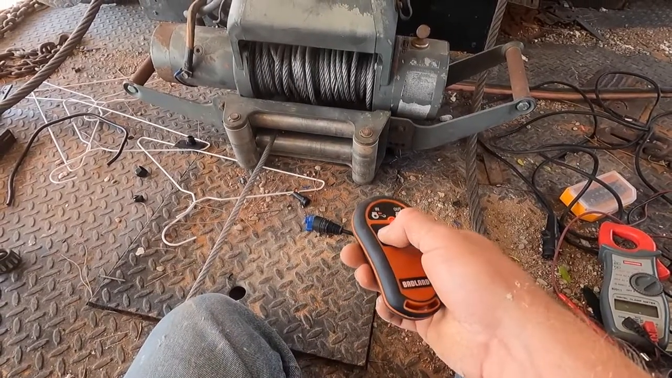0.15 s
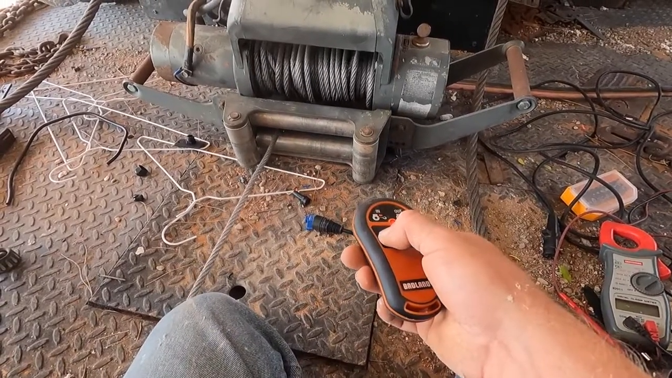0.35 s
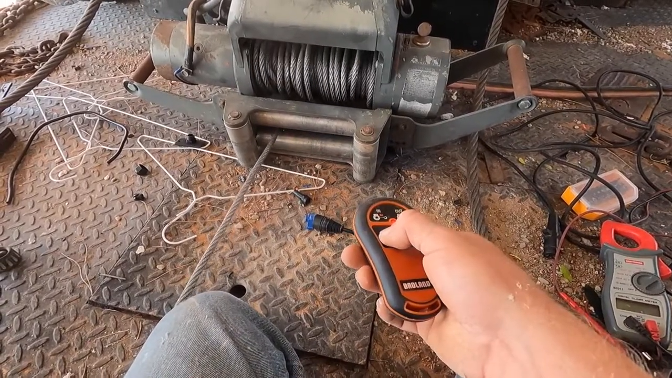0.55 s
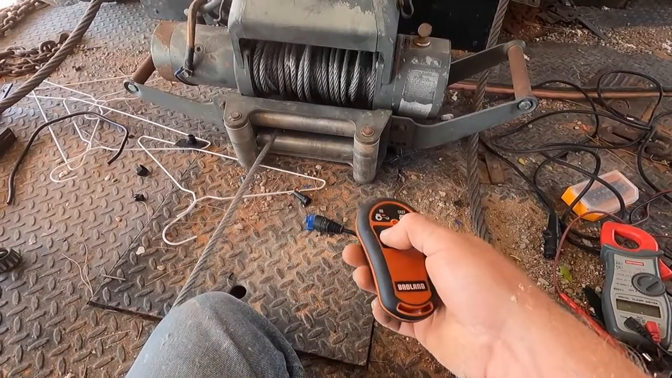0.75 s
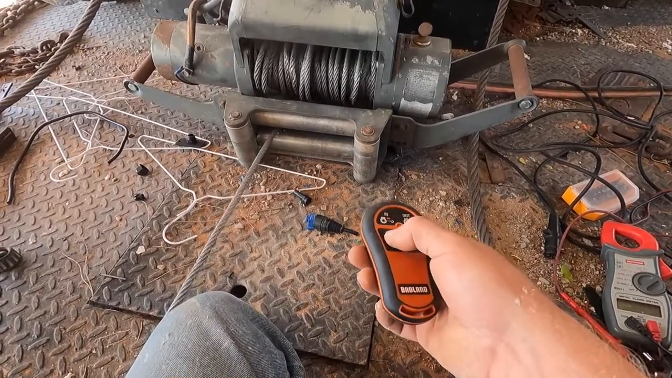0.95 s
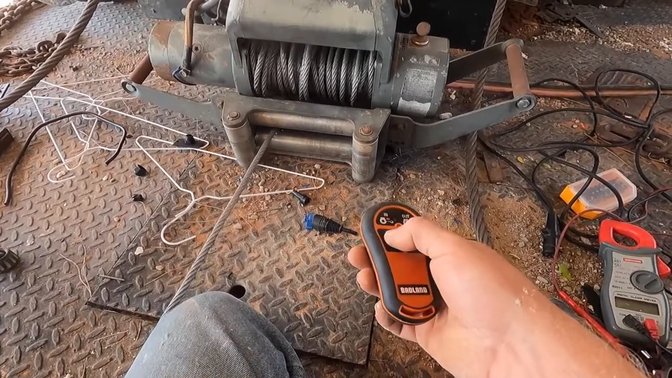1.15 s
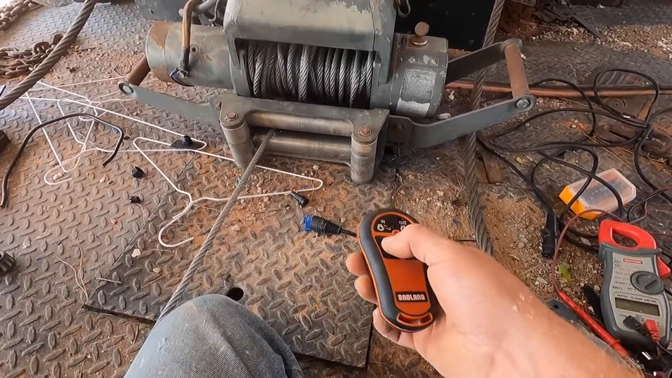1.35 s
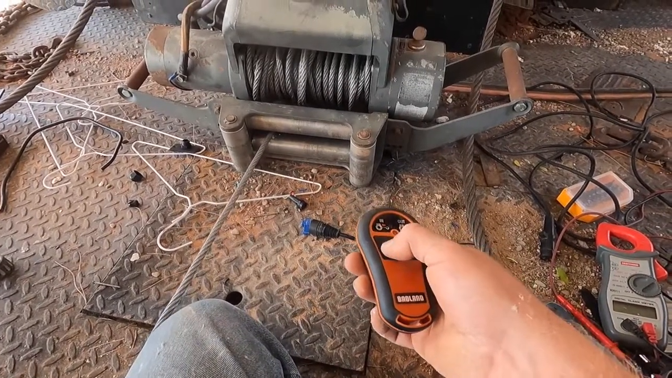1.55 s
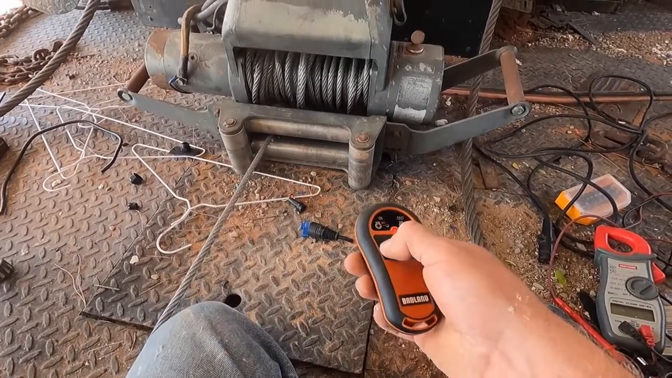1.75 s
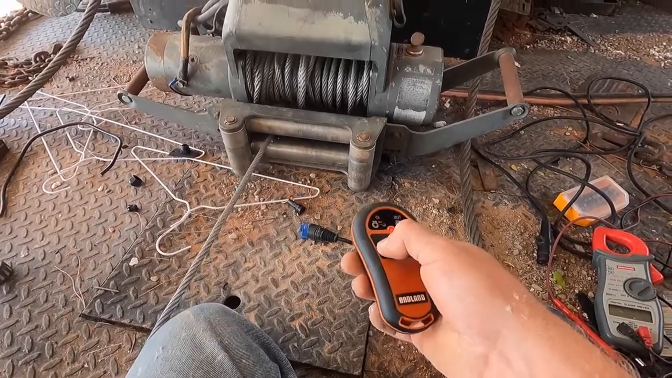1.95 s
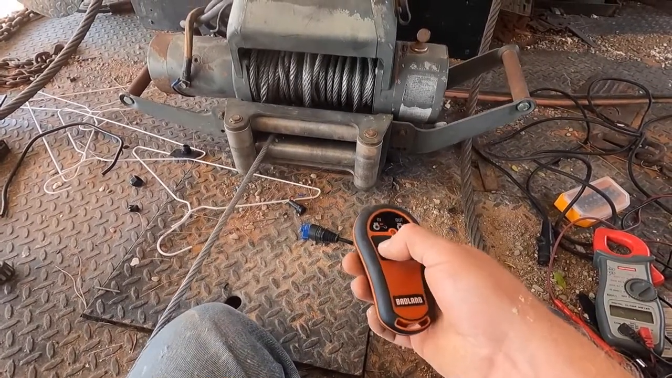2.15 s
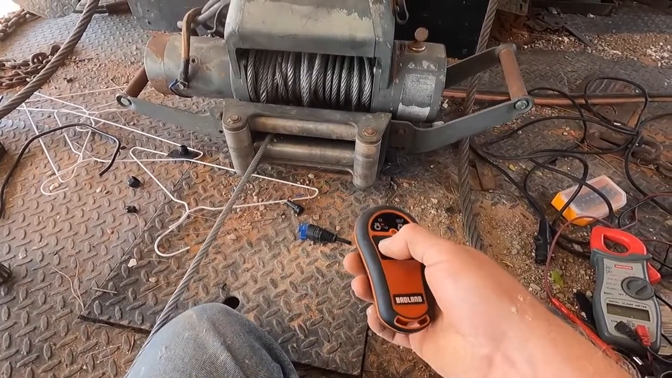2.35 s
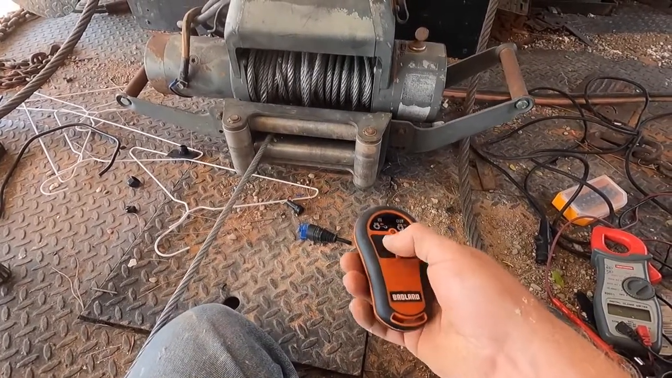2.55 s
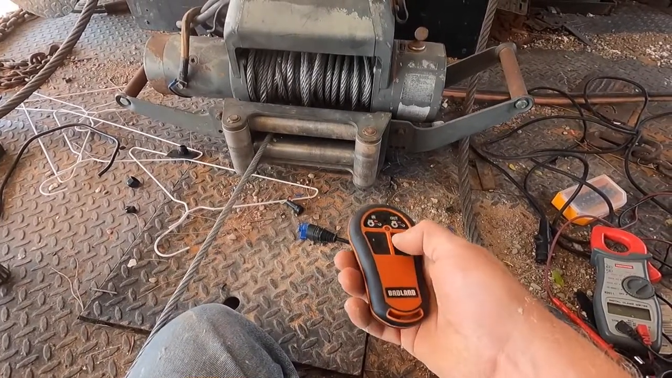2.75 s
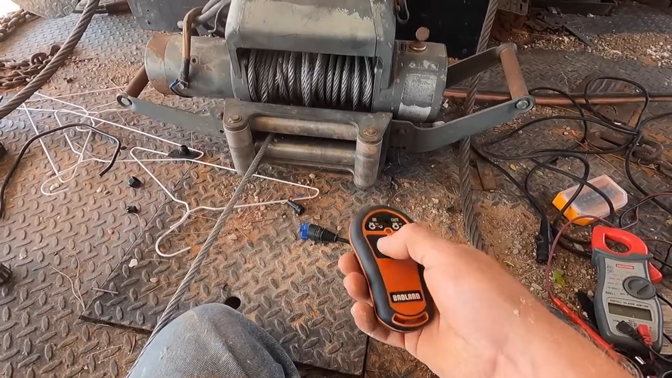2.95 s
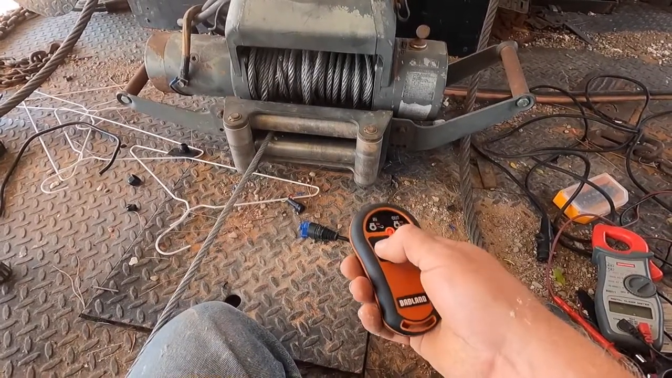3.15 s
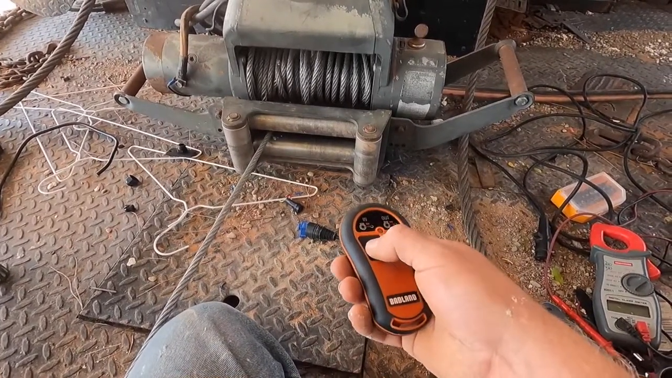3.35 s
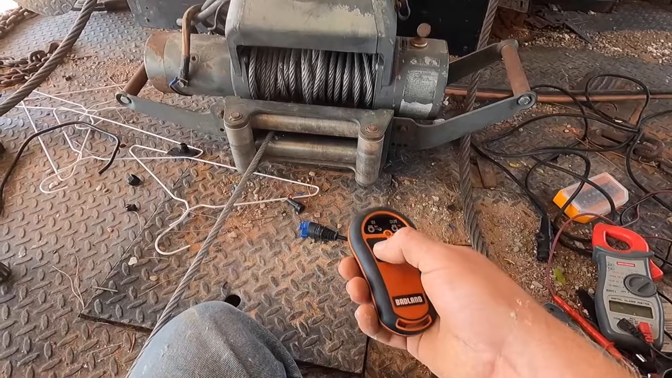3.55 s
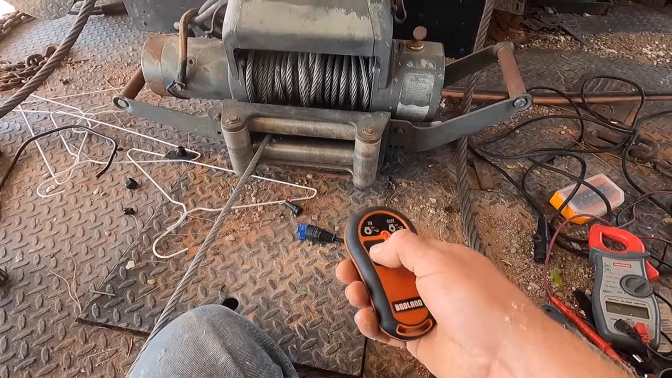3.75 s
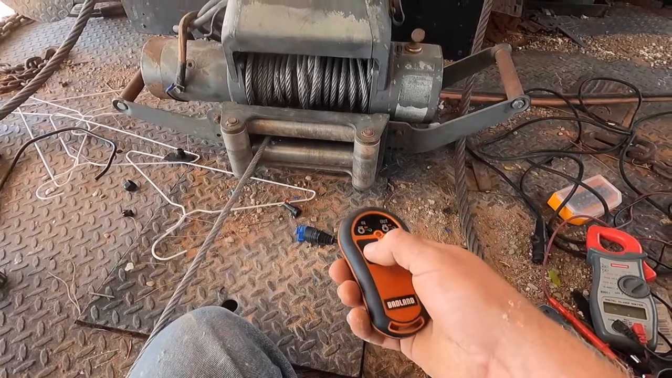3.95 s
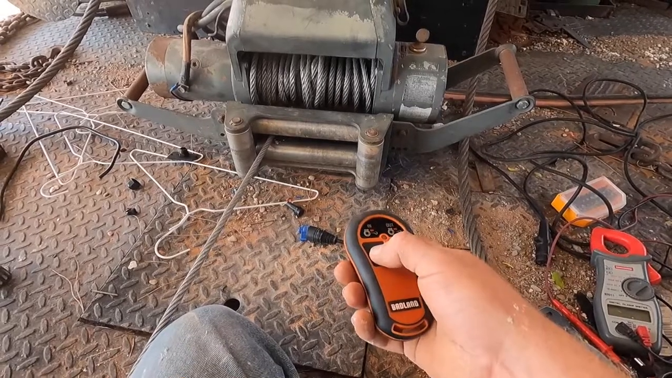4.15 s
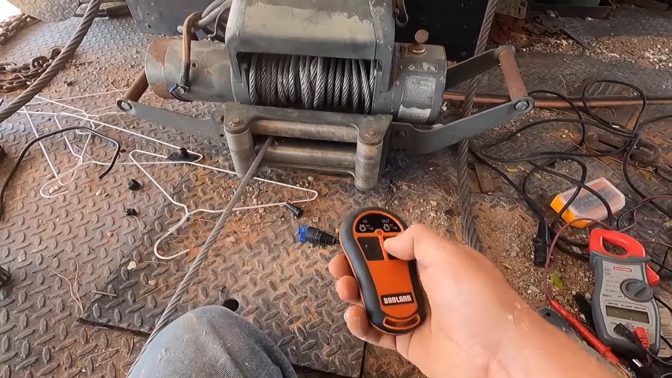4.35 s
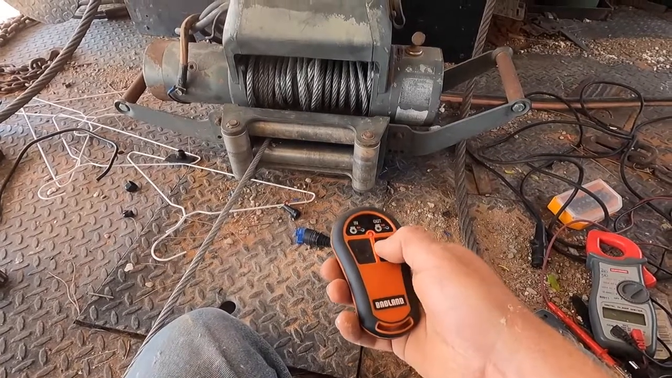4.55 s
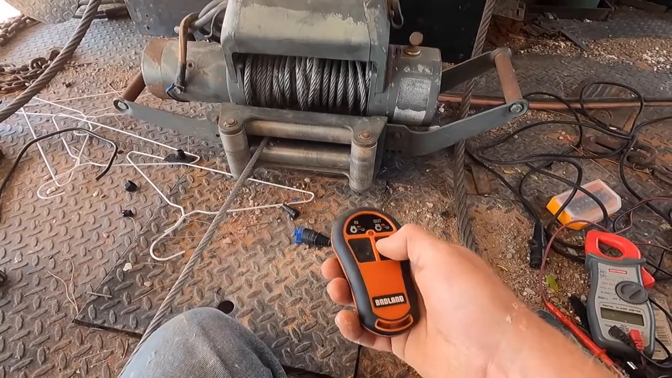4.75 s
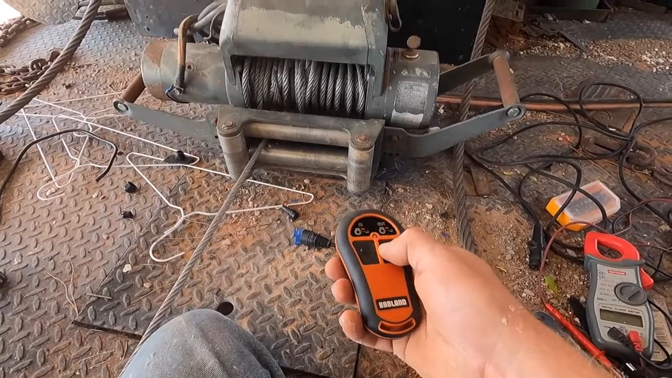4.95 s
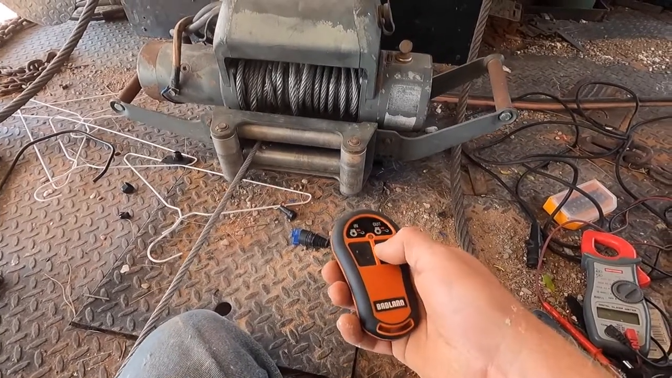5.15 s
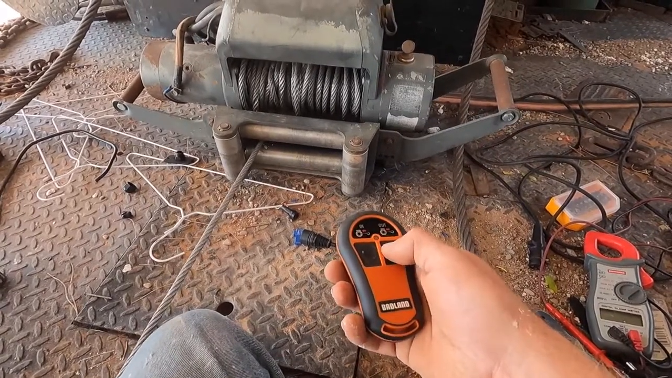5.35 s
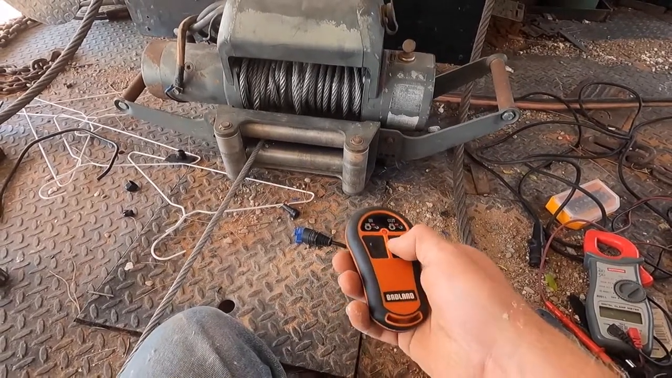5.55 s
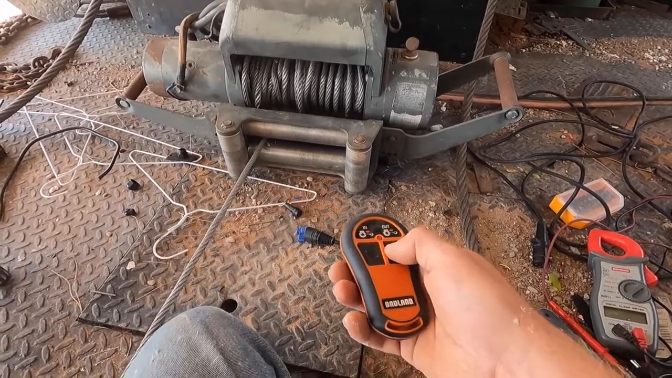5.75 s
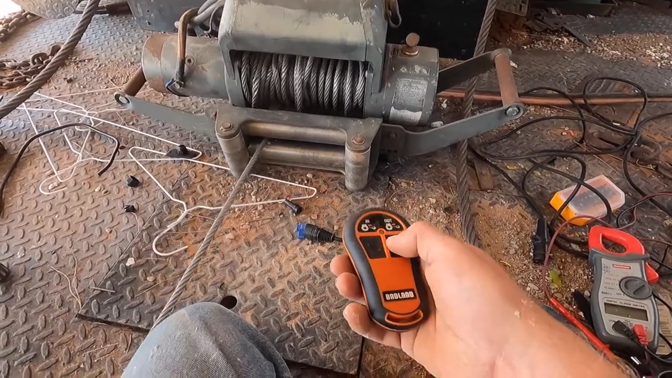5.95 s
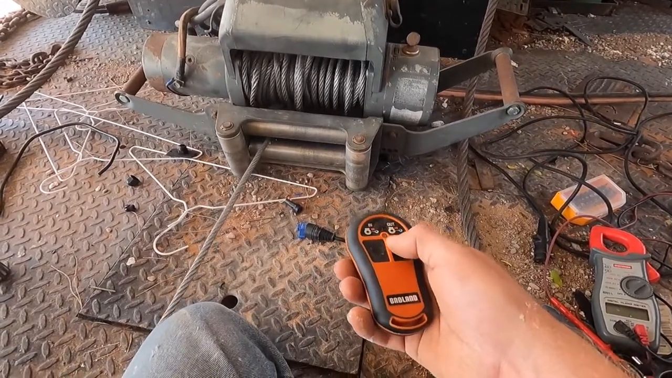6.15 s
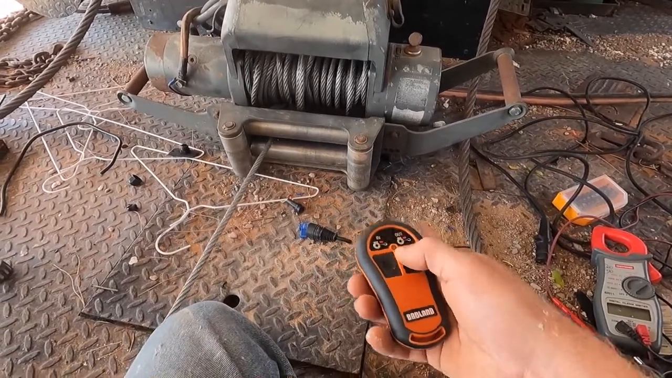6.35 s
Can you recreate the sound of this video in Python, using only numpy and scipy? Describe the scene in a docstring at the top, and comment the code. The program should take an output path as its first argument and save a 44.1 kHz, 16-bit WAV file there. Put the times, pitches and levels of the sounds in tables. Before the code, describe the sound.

Short bursts of a rattling electric winch motor start with a clack and wind down, amid rope cracks, deck thumps, gritty brake rasps and a faint passing engine.

```python
"""An engine drones past far off, as filtered noise and a pulsing tone, while an earlier winch run dies away.
The wire rope ticks and thumps the steel truck deck: short cracks and fading tones. Six times the contactor clacks,
the motor whines up as a gliding tone, gears rattle as tiny impacts, and a knock and a coast down follow.
From the second run on, a button clicks before four of the runs and the rope judders now and then.
The drum brake rasps in runs two to four, as gritty noise with chatter; near the fifth, steel squeaks once.
"""
import sys
import numpy as np
from scipy import signal
from scipy.fft import rfft, irfft, next_fast_len
from scipy.io import wavfile
from scipy.ndimage import uniform_filter1d, map_coordinates

SR = 44100
rng = np.random.default_rng(int(sys.argv[2]) if len(sys.argv) > 2 else 0)


def generate_wav(sig):
    """Save sig (samples, or channels by samples) to the path in sys.argv[1] as 16-bit PCM at SR."""
    pcm = np.round(np.clip(np.atleast_2d(sig).T, -1, 1) * 32767).astype(np.int16)
    wavfile.write(sys.argv[1], SR, pcm)


N = 286650

# In spectra and sets of modes, levels are relative: the sound is scaled afterwards.
# passing vehicle, one row per sound: loudest at t/s, half-width/s, level/dB
FIRING_PASS = (2.1, .42, -27.8)
EXHAUST_PASS = (1.6, .55, -28)
TYRE_PASS = (1.55, .52, -32.5)
# engine firing tone and its multiples: multiple, level/dB
FIRING_ORDERS = [(1, 0), (2, -10.5), (3, -6.5)]
# outdoor spectra (exhaust, tyres, open air, air buffeting the microphone): f/Hz, level/dB
EXHAUST = [(20, -10), (45, -14.5), (70, 2.5), (130, -1.5), (200, -8), (350, -8), (600, -25), (1000, -13.5),
           (2000, -38.5), (5000, -43), (12000, -68)]
TYRES = [(200, -14), (450, -1), (700, 1), (1000, 0), (1600, -7), (2500, -24), (4000, -29), (6500, -39),
         (9000, -60), (15000, -80)]
AIR = [(20, 7), (45, -2), (75, 9), (120, 4), (250, -5), (500, -7), (1000, 2.5), (1600, 2), (3000, -9),
       (6000, -19), (10000, -36), (15800, -62)]
BUFFET_SPECTRUM = [(12, 1), (25, 2.5), (38, 10), (55, -5), (120, -46), (500, -92)]
# air buffeting the microphone: t/s, level/dB
BUFFET_LEVEL = [(0.0, -49), (0.36, -56), (1.88, -46), (1.94, -39), (3.06, -50), (3.13, -31), (3.6, -50),
                (3.75, -45), (4.89, -55), (5.16, -47), (5.6, -56), (6.5, -58)]
# motor runs, the first already dying away: switched on t/s, powered/s, coast/s, run-up time constant/s,
# whine level/dB (before its resonance), deck rumble level/dB (before its lift), gear rattle level/dB,
# brush hiss level/dB (before its lift), build-up time constants of rattle/s and hiss/s
JOGS = [(-.7, .3, .7, .05, -30, -35, -33, -48, .05, .07),
        (.105, 0.75, 0.85, 0.205, -28, -29.5, -25.5, -40.8, .3, .12),
        (1.893, 0.34, .42, 0.048, -26, -28.5, -27.5, -42.5, .045, .045),
        (3.272, 0.21, .28, 0.055, -24, -27.5, -30, -41, .055, .04),
        (3.903, 0.21, 0.23, .054, -22.5, -30.5, -31.5, -46.5, .035, .03),
        (4.65, 0.18, .5, .062, -21, -34, -30.5, -43.5, .07, .05),
        (5.742, .16, 0.62, .047, -19, -30, -29, -41.3, .06, .05)]
# spectra of the deck, gears and brushes: f/Hz, level/dB
DECK = [(60, -35.5), (90, -2.5), (150, -9.5), (210, 0.5), (245, 4), (290, -2.5), (335, -7.5), (400, -8),
        (560, -14), (800, -30.5), (1500, -73)]
GEARS = [(250, -31), (480, -6.5), (720, -1.5), (1000, -1.3), (1700, -2.5), (2300, -13.5), (3500, -18),
         (6000, -52), (12000, -96)]
BRUSHES = [(1000, -14.5), (2200, 6), (3200, 0.5), (4700, 0.5), (6000, -4), (7500, -6), (8800, -13.5),
           (11000, -16), (13500, -25.5), (15000, -32), (15800, -48)]
# resonances of the gear casing: f/Hz, width/Hz, lift/dB
CASING = [(723.5, 30, 7.5), (828, 34, 8), (925, 100, 7.5), (1260, 130, 5), (1466, 52, 5.5), (1590, 15, 3),
          (1830, 180, 5.5), (2243, 30, 6.5), (2905, 115, 6.5), (3570, 270, 2.5), (4115, 110, 9.5),
          (4600, 110, 3), (4790, 90, 4), (5320, 160, 2), (6336, 220, 8), (6830, 260, 4), (7750, 160, 6.5)]
# motor (commutator) tone and its neighbours: multiple of the shaft speed, level/dB
WHINE_ORDERS = [(16, -10), (22, -12), (28, -11), (32, -1), (36, -14)]
# likeness of left and right: f/Hz, likeness from 0 to 1
ALIKE = [(60, 0.98), (200, 0.98), (500, 0.82), (1000, 0.84), (2000, 0.35), (4000, 0.66), (8000, 0.7),
         (12000, 0.1)]
# how long the yard's echo takes to fall 60 dB: f/Hz, fall time/s
YARD = [(200, 0.092), (2000, 0.28), (10000, 0.1)]
# rubbing parts lock onto one resonance for a moment: middle t/s, length/s, f/Hz, width/Hz, level/dB
SINGING = [(0.648, 1.2, 246, 35, -30), (0.748, 1.2, 722, 70, -30), (.65, .8, 6350, 130, -44),
           (2.349, 0.071, 2900, 60, -31), (3.39, .14, 900, 50, -29), (3.384, 0.055, 3610, 60, -31),
           (3.388, 0.074, 2700, 60, -31), (3.43, .07, 8270, 120, -42), (4.037, .06, 3860, 60, -30),
           (4.052, .09, 2600, 60, -30), (4.05, .1, 3240, 60, -30), (4.85, .24, 2220, 140, -35),
           (5.85, .12, 1320, 110, -31), (6.19, .16, 1290, 130, -31), (6.02, .4, 2030, 220, -35),
           (6.08, .4, 965, 80, -34), (6.39, .12, 240, 35, -33)]
# rope strands snap over each other: t/s, level/dB (before a 3.5 dB cut for the snap), ring f/Hz, crack level/dB
TICKS = [(.0682, -33, 4700, 2), (.129, -22, 6400, -6), (.1427, -13.5, 1870, 0), (1.455, -31, 2600, 4),
         (1.509, -26, 2797, 0), (2.162, -13, 1870, 0), (2.1805, -12, 5260, 0), (2.253, -12, 5050, 0),
         (2.4114, -21, 2000, 1), (2.4723, -6.5, 5300, 0), (3.3324, -19, 1940, 0), (3.427, -11, 2320, 0),
         (3.44, -11, 3720, 0), (3.5194, -19, 4300, 0), (3.6221, -9.5, 3390, 0), (3.9975, -15, 2560, 1),
         (4.2044, -16, 3400, -4), (4.4308, -14, 1760, 0), (4.451, -23, 2150, 1), (4.9701, -23, 1830, -4),
         (5.0598, -21, 2010, 1), (5.0791, -20, 1944, 1), (5.0993, -23.5, 2000, 0), (5.1497, -21, 1862, 1),
         (5.2008, -18, 2250, -7), (5.3153, -36, 2700, -6), (6.0046, -8.5, 2043, -3), (6.044, -16, 5180, -1),
         (6.172, -24, 1900, -4), (6.3041, -24, 2850, -4)]
# the rope jerks the deck: t/s, level/dB, ring f/Hz, low boom level/dB
THUMPS = [(.145, -14, 236, -33), (1.29, -7, 212.8, -22), (2.209, -13, 498, -26), (2.271, -7.5, 218, -30),
          (2.463, -14, 229, -30), (2.484, -4, 232, -27), (2.513, -13, 245, -32), (2.547, -12, 256, -34),
          (5.14, -28, 230, -24), (5.911, -12, 196, -18), (5.936, -7, 191, -20), (5.968, -6, 236, -24),
          (6.048, -10, 238, -14)]
# spectra of a sharp snap, the rope's dull body and the whole deck flexing: f/Hz, level/dB
SNAP = [(800, -25), (2000, -4), (4000, -3), (6400, -2), (8000, -3), (9500, -11), (13000, -17), (15500, -27),
        (17000, -60)]
ROPE_BODY = [(400, -72), (1200, -17), (2100, -6.5), (3000, -23), (6000, -24), (8000, -24), (12000, -32),
             (16000, -48)]
BOOM = [(30, -25), (62, -3), (110, 4), (160, 0), (260, -22), (800, -70)]
# modes of the drum's steel flange: f/Hz, level/dB, time to fall 60 dB/s
FLANGE = [(2083, -5, .07), (2770, -10, .05), (3800, -7, .035), (5286, -5, .09), (6250, -1, .05),
          (7068, -8, .04), (7800, -8, .06)]
# the contactor closes: t/s, level/dB, ring f/Hz, treble level/dB (before an 8 dB lift)
SWITCH_ON = [(0.106, -8.5, 1700, -19), (1.883, -8, 1477, -18.5), (3.262, -8, 1490, -18.5),
             (3.893, -9.5, 1560, -18), (4.635, -11.5, 1020, -12), (5.725, -12, 1239, -14)]
# the contactor drops out or the gears take up slack:
# t/s, level/dB, ring f/Hz, treble level/dB (before a 6 dB lift), frame thud level/dB
KNOCKS = [(.147, -7.5, 850, -24, -18), (.8445, -7, 1300, -33, -22), (2.221, -6, 1050, -29, -16),
          (3.485, -6.5, 1270, -24, -24), (3.915, -14, 970, -16, -14), (4.116, -7, 1200, -28, -24),
          (4.659, -8.5, 975, -17, -16), (4.816, -9, 1500, -14, -20), (5.907, -9, 1680, -11, -14)]
# modes of the contactor box: f/Hz, level/dB, time to fall 60 dB/s
BOX = [(700, -16, 0.058), (958, -3.5, 0.047), (1287, 3.5, 0.021), (1527, 4.5, 0.017), (1667, -5, 0.039),
       (2164, -4.5, 0.021), (2590, -5, 0.024), (2730, -8, 0.032), (3770, -7.5, 0.025), (4410, -13, 0.039),
       (6200, -22.5, .025)]
# spectra of the clack and of the frame's thud: f/Hz, level/dB
CLACK = [(150, -14), (600, -20), (1000, 10), (1500, 1.5), (2000, 5), (2600, 6.5), (3300, -13), (5000, -45),
         (12000, -26)]
THUD = [(150, -9), (320, 1), (520, -4.5), (700, -12.5), (1200, -7.5), (3000, -76)]
# the thumb presses the remote's button: t/s, level/dB
BUTTON = [(1.744, -36), (3.125, -26), (3.726, -30), (5.5612, -20)]
# modes of the remote's plastic shell: f/Hz, level/dB, time to fall 60 dB/s
SHELL = [(1650, -3, .02), (2121, -1, .018), (3623, -3, .009), (4290, -2, .01), (7200, -8, .01)]
# the taut rope judders over the drum: t/s, length/s, level/dB, release/(dB per s)
JUDDER = [(2.17, .05, -29, 250), (2.47, .05, -27, 260), (5.903, .1, -23.5, 75)]
# resonances of the deck plate under the rope: f/Hz, width/Hz, lift/dB
PLATE = [(101, 18, 10), (187, 18, 14), (238, 26, 14), (362, 40, 8), (485, 45, 8)]
# broad spectrum of the juddering: f/Hz, level/dB
CRUNCH = [(40, -22), (90, -4), (250, -2), (400, -8), (650, -16), (1500, -22), (7000, -30), (10000, -48),
          (16000, -65)]
# the brake drags: t/s, length/s, level/dB, release/(dB per s), chatter f/Hz, chatter over grit/dB,
# treble/dB (grows from 3 kHz, in full from 6 kHz), ring pitch ratio
BRAKE = [(2.278, .2, -30, 200, 415, -4, -2, 1), (2.475, .05, -30, 160, 355, -6, -1, 1),
         (3.3, .18, -22.5, 330, 892, -4, -1, 1), (3.551, .085, -22, 170, 465, -4, 4.5, 1.01),
         (3.925, .2, -22, 330, 645, -5, -5.5, .975), (4.14, .07, -24, 165, 372, -4, 0, 1.01)]
# resonances of the brake drum, before the pitch ratio: f/Hz, width/Hz, lift/dB
DRUM = [(985, 110, 12), (1287, 230, 0.5), (1800, 81, -1.5), (1900, 89, 3.5), (2240, 61, 8), (2523, 42, 1.5),
        (2687, 60, 9), (2770, 25, 4), (2912, 34, 8), (3210, 170, 7.5), (3590, 40, 10), (3910, 140, 7),
        (3770, 48, 7), (4430, 67, 11), (4660, 60, 10), (5290, 110, 10), (5550, 150, 5), (6200, 300, 4),
        (7700, 350, 6)]
# spectrum of the brake's rasp: f/Hz, level/dB
RASP = [(400, -35), (900, -3), (1700, 4.5), (2400, -1.5), (3600, -1.5), (4500, -6.5), (5600, -8),
        (6800, -12.5), (8500, -30), (15000, -47)]
# the squeak's path: t/s, f/Hz, level/dB (before it is leaned left)
SQUEAK = [(4.70, 6810, -100), (4.718, 6770, -26.5), (4.73, 6666, -14.5), (4.755, 6616, -15),
          (4.768, 6620, -28), (4.80, 6604, -47), (4.84, 6596, -120)]
# the stereo image narrows almost to mono, then opens out: t/s, side level/dB
WIDTH = [(0, -9), (.4, -58), (2.35, -63), (2.6, -23), (3.0, -13), (3.15, -4), (6.5, 2)]

# firing rate at the closest point, share it shifts far away, and time scale of the drop
FIRING_HZ, DOPPLER, DOPPLER_S = 62, .08, .7
FULL_TURNS_PER_S = 88  # shaft speed
DECK_POWER, GEAR_POWER, BRUSH_POWER = 0.49, 0.67, 1.3  # each layer grows as speed to this power
DECK_LIFT_DB, BRUSH_LIFT_DB = 1.0, 10.5
MESH_DB, MESH_JITTER = -3.5, .006  # gear tones against the rattle; backlash smears them by about this share
COAST_WHINE_DB = -16  # added to the whine once the power is off
TICK_BODY_DB, TICK_BODY_GROWS = -14, 0.46  # body at a tick of 0 dB; it grows slower, so hard snaps are brighter
FAINT_TICKS_PER_S, FAINT_TICK_DB = 4.5, -31  # average rate; level at the start of a coast, fading through it
LAND_S = .002  # the plunger lands this long after the listed time
CLACK_START_S, CLACK_START_DB = .005, -20  # a faint noise burst softens the start of each clack
BOUNCE_S, BOUNCE_DB = .004, -8  # the plunger rebounds once
SHAKE_S, SHAKE_DB = .014, -19  # loose parts rattle on after the clack
KNOCK_START_S, KNOCK_START_DB = .007, -13  # a weaker noise burst softens the start of each knock
JUDDER_SLIPS_PER_S, JUDDER_ATTACK_S = 170, .008
BRAKE_ATTACK_S, CHATTER_JITTER = 0.016, .02  # the slip rate wanders by about this share
LEFT_LAG_S = 1.7e-5  # the winch reaches the left microphone this much later
TOP_HZ = 15800  # nothing is kept above this


def amp(db):
    """Decibels to gain."""
    return np.exp(np.asarray(db) * (np.log(10) / 20))


def unit(x):
    """Scales a sound to an average (rms) strength of 1."""
    return x / np.sqrt(np.mean(x ** 2) + 1e-20)


def along(points, hz):
    """Reads a curve of (f/Hz, value) points on a log frequency axis."""
    f, v = np.transpose(points)
    return np.interp(np.log(hz + 1), np.log(f + 1), v)


def curves(rows):
    """Gives one value per sample for each column after the time."""
    s, *columns = np.transpose(rows)
    return [np.interp(np.arange(N) / SR, s, column) for column in columns]


def wobble(rate):
    """A smooth random curve with rate random points a second."""
    steps = 8
    count = int(N * rate / SR) + 4
    at = np.arange(count * steps) / steps
    smooth = map_coordinates(rng.standard_normal(count), [at], mode="nearest")
    return np.interp(np.arange(N) * rate / SR, at, smooth)


def colour(x, spectrum, modes=()):
    """Filters with a broad spectrum and resonances on top, never sounding ahead of the input."""
    size = 2 * next_fast_len(x.shape[-1] // 2 + 4096)
    hz = np.fft.rfftfreq(size, 1 / SR)
    db = along(spectrum, hz)
    db = db + sum(lift / (1 + (2 * (hz - f) / width) ** 2) for f, width, lift in modes)
    # folding the cepstrum makes the filter minimum phase
    cepstrum = irfft(np.log(amp(db)))
    cepstrum[1:size // 2] *= 2
    cepstrum[size // 2 + 1:] = 0
    return irfft(rfft(x, size) * np.exp(rfft(cepstrum)), size)[..., :x.shape[-1]]


def spread(pair):
    """Turns two unrelated signals into left and right, as alike at each frequency as the table says."""
    size = next_fast_len(pair.shape[-1] + 512, True)
    likeness = np.clip(along(ALIKE, np.fft.rfftfreq(size, 1 / SR)), -1, 1)
    turn = np.arccos(likeness) / 2
    mid, side = irfft(rfft(pair, size) * [np.cos(turn), np.sin(turn)], size)[:, :pair.shape[-1]]
    return np.array([mid + side, mid - side])


def rush(spectrum):
    """Steady stereo noise of rms 1."""
    return unit(colour(spread(rng.standard_normal((2, N))), spectrum))


def rattle(rate, size_db, smooth):
    """Tiny impacts of scattered size, about rate a second, on a bed of sliding noise."""
    hits = (rng.random(N) < rate / SR) * amp(size_db * rng.standard_normal(N))
    impacts = unit(hits * rng.choice([-1, 1], (2, N)))
    return spread(impacts + smooth * rng.standard_normal((2, N)))


def ring(hz, t60, attack):
    """One vibration dying away, falling 60 dB in t60 seconds."""
    t = np.arange(SR // 4) / SR
    return np.sin(2 * np.pi * hz * t) * amp(-60 * t / t60) * (1 - np.exp(-t / attack))


def burst(spectrum, t60, tail_db, tail_t60):
    """A noise crack and its weaker, duller after-ring in the casing, with peak 1."""
    t = np.arange(SR // 4) / SR
    attack, dull_hz = .0014, 6500
    crack, tail = rng.standard_normal((2, 2, len(t)))
    tail = signal.sosfilt(signal.butter(2, dull_hz, fs=SR, output="sos"), tail)
    pair = crack * amp(-60 * t / t60) + tail * amp(tail_db - 60 * t / tail_t60)
    x = colour(spread(pair * (1 - np.exp(-t / attack))), spectrum, CASING)
    return x / np.abs(x.mean(0)).max()


def struck(modes):
    """A small part rings in all its modes, a little differently each time, with peak 1."""
    x = 0
    for hz, db, t60 in modes:
        level = amp(db + rng.normal(0, 2, (2, 1)))
        x = x + level * rng.choice([-1, 1]) * ring(hz, t60, attack=.0004)
    return x / np.abs(x.mean(0)).max()


def flare(x, patchy_db):
    """Patches of the spectrum swell and fade, each on its own."""
    z = signal.stft(x, nperseg=512)[2]
    field = uniform_filter1d(rng.standard_normal(z.shape[1:]), size=3, axis=0)
    field = uniform_filter1d(field, size=9, axis=1)
    return unit(signal.istft(z * amp(patchy_db * unit(field)), nperseg=512)[1][:, :N])


def steel(x, ring_db, t60):
    """A steel shell adds a short ring of countless close modes, made as fading noise."""
    t = np.arange(SR // 10) / SR
    tail = rng.standard_normal(len(t)) * amp(-60 * t / t60)
    ringing = signal.oaconvolve(x, tail[None] / np.linalg.norm(tail), axes=1)
    return x + amp(ring_db) * ringing[:, :x.shape[-1]]


def add(track, s, sound):
    """Mixes a sound in at a time in seconds."""
    part = track[:, max(0, round(s * SR)):][:, :sound.shape[-1]]
    part += sound[..., :part.shape[1]]


def pan(x, left_db):
    """Leans a sound to the left."""
    return x * amp([[left_db / 2], [-left_db / 2]])


def passing(closest, half_width, db):
    """Gain of a source moving by in a straight line: one over its distance."""
    return amp(db) / np.hypot(1, (np.arange(N) / SR - closest) / half_width)


def outdoors():
    """A distant engine swells and drops in pitch as it passes with its tyre noise, over the hush of open air."""
    along_road = (np.arange(N) / SR - FIRING_PASS[0]) / DOPPLER_S
    hz = FIRING_HZ * (1 - DOPPLER * along_road / np.hypot(1, along_road))
    phase = 2 * np.pi * np.cumsum(hz * (1 + 0.01596 * wobble(15))) / SR
    firing = unit(sum(amp(db + 2.6 * wobble(8)) * np.sin(k * phase) for k, db in FIRING_ORDERS))
    vehicle = passing(*FIRING_PASS) * firing
    vehicle = vehicle + passing(*EXHAUST_PASS) * rush(EXHAUST) + passing(*TYRE_PASS) * rush(TYRES)
    buffet = amp(curves(BUFFET_LEVEL)[0]) * rush(BUFFET_SPECTRUM)
    return vehicle + buffet + amp(-46.0) * rush(AIR)


def speed(on, powered, coast, run_up):
    """Share of full speed in one run: the motor races up, then friction slows it evenly to a stop."""
    t = np.maximum(np.arange(N) / SR - on, 0)
    return (1 - np.exp(-t / run_up)) * np.clip(1 - (t - powered) / coast, 0, 1)


def shaft():
    """Turns a second, over all runs."""
    return FULL_TURNS_PER_S * sum(speed(*row[:4]) for row in JOGS)


def mesh(count):
    """Uneven teeth repeat every turn, in a pattern that slowly changes as the planet gears go round."""
    turn_hz = shaft()
    turns = np.cumsum(turn_hz * (1 + MESH_JITTER * wobble(120))) / SR
    teeth = signal.resample(rng.standard_normal((count, 128)), 2048, axis=1)
    place = (turns % 1 * teeth.shape[1]).astype(int)
    shares = np.array([wobble(14) for _ in teeth])
    pattern = (shares * teeth[:, place]).sum(0) / np.linalg.norm(shares, axis=0)
    return unit(pattern * turn_hz)


def gear_train():
    """Gear teeth and brushes rattle the casing, and the mount shakes the deck: all louder with speed."""
    deck_level = gear_level = brush_level = 0
    for on, powered, coast, _, _, deck_db, gear_db, brush_db, gear_rise, brush_rise in JOGS:
        drive = speed(on, powered, coast, gear_rise)
        deck_level += amp(deck_db) * drive ** DECK_POWER
        gear_level += amp(gear_db) * drive ** GEAR_POWER
        brush_level += amp(brush_db) * speed(on, powered, coast, brush_rise) ** BRUSH_POWER
    lurch = 0.6 * wobble(35)  # uneven tooth load, dB
    grind = 1.5 * wobble(160)  # single teeth catching, dB
    orders = mesh(count=4)
    rumble = unit(colour(rattle(1400, size_db=2.5, smooth=0.85), DECK))
    deck = unit(rumble + amp(-6) * unit(colour(orders, DECK)))
    teeth = unit(colour(unit(rattle(1100, size_db=3, smooth=0.65)), GEARS, CASING))
    gears = flare(teeth + amp(MESH_DB) * unit(colour(orders, GEARS, CASING)), patchy_db=1.8)
    hiss = steel(rattle(2500, size_db=3, smooth=.8), ring_db=-6, t60=.05)
    brushes = flare(colour(hiss, BRUSHES, CASING), patchy_db=1.7)
    treble = amp(lurch + grind) * gear_level * gears + amp(lurch + BRUSH_LIFT_DB) * brush_level * brushes
    return amp(DECK_LIFT_DB) * deck_level * deck + pan(treble, left_db=1.5)


def whine():
    """The motor tone flares through a casing resonance, is lost above it, and glides back softly in the coast."""
    bars = 32  # contact bars on the commutator, so cycles per turn
    casing_hz, width_hz = 1850, 170
    hz = bars * shaft()
    t = np.arange(N) / SR
    level = 0
    for on, powered, coast, _, db, *_ in JOGS:
        gain = amp(db + COAST_WHINE_DB * (t > on + powered))
        level = level + gain * (t > on) * np.clip(1 - (t - on - powered) / coast, 0, 1)
    resonance = 0.15 + 1 / (1 + (2 * (hz - casing_hz) / width_hz) ** 2)
    lift = resonance / (1 + (hz / 2000) ** 30)
    phase = 2 * np.pi * np.cumsum(hz * (1 + 0.0138 * wobble(300))) / SR
    tone = sum(amp(db + 2 * wobble(120)) * np.sin(phase * order / bars) for order, db in WHINE_ORDERS)
    return pan(level * lift * tone, left_db=1)


def yard(x):
    """Truck body and ground answer with a short diffuse tail."""
    hz, t, z = signal.stft(rng.standard_normal((2, SR // 2)), SR, nperseg=256)
    fading = z * amp(-60 * t / along(YARD, hz)[:, None])
    tail = signal.istft(fading, SR, nperseg=256)[1]
    late = np.pad(x, ((0, 0), (200, 0)))  # the answer starts 200 samples late
    return signal.fftconvolve(late, tail / np.linalg.norm(tail[0]), axes=1)[:, :N]


def singing():
    """Each rubbing resonance swells and fades as a narrow, fluttering band."""
    out = np.zeros((2, N))
    for s, length, hz, width_hz, db in SINGING:
        t = np.arange(int(abs(length) * SR)) / SR
        knots = rng.standard_normal((2, 1024))
        a, b = (map_coordinates(k, [t * width_hz], mode="nearest") for k in knots)
        tone = np.real((.35 + 0.55 * (a + 1j * b)) * np.exp(2j * np.pi * hz * t))
        add(out, s - length / 2, amp(db) * signal.windows.tukey(len(t), .8) * tone)
    return pan(out, left_db=3.0)


def faint_ticks():
    """Small snaps at random moments of each coast, as rows like those of TICKS."""
    ring_hz = 1950
    rows = []
    for on, powered, coast, *_ in JOGS:
        gaps, sizes = rng.exponential(size=8), rng.standard_normal(size=8)
        times = np.cumsum(gaps) / FAINT_TICKS_PER_S
        for s, size in zip(times, sizes):
            if s < coast:
                db = FAINT_TICK_DB + 1.7 * size + 20 * np.log10(1 - s / coast)
                rows.append((on + powered + s, db, ring_hz, 0))
    return rows


def rope():
    """Wire turns snap into place on the drum, and the jerks boom in the deck plate."""
    out = np.zeros((2, N))
    for s, db, hz, crack_db in TICKS + faint_ticks():
        crack = amp(crack_db) * burst(SNAP, t60=0.016, tail_db=-11, tail_t60=0.055)
        snap = 0.66 * crack + 0.3 * ring(hz, t60=0.06, attack=.0003) + 0.5 * struck(FLANGE)
        body = burst(ROPE_BODY, t60=0.0068, tail_db=-6.5, tail_t60=0.092)
        add(out, s, amp(db - 3.5) * snap + amp(TICK_BODY_DB + TICK_BODY_GROWS * db) * body)
    for s, db, hz, boom_db in THUMPS:
        noise = burst(DECK, t60=0.067, tail_db=-31, tail_t60=0.25)
        add(out, s, amp(db) * (ring(hz, t60=0.11, attack=0.0073) + 0.23 * noise))
        add(out, s, amp(boom_db) * burst(BOOM, t60=.2, tail_db=-10.5, tail_t60=0.38))
    return out


def clack(strike_hz, focus_db):
    """The box's modes, strongest near the pitch that the blow favours, with peak 1."""
    x = 0
    for hz, db, t60 in BOX:
        octaves = abs(np.log2(hz / strike_hz))
        level = amp(db - focus_db * octaves + rng.normal(0, 2.6, (2, 1)))
        x = x + level * rng.choice([-1, 1]) * ring(hz, t60, attack=0.00068)
    return x / np.abs(x.mean(0)).max()


def contactor():
    """The plunger slams shut with a sharp clack; release and backlash give duller knocks that shake the frame."""
    out = np.zeros((2, N))
    for s, db, hz, treble_db in SWITCH_ON:
        land = s + LAND_S
        treble = amp(treble_db + 8)
        soft_start = burst(RASP, t60=.03, tail_db=-10, tail_t60=.05)
        add(out, land - CLACK_START_S, amp(db + CLACK_START_DB) * soft_start)
        body = clack(hz, focus_db=5) + 0.38 * burst(CLACK, t60=0.055, tail_db=-20, tail_t60=0.12)
        add(out, land, amp(db) * (body + treble * burst(SNAP, t60=.016, tail_db=-10, tail_t60=.1)))
        rebound = clack(hz, focus_db=7) + treble * struck(FLANGE)
        add(out, land + BOUNCE_S, amp(db + BOUNCE_DB) * rebound)
        add(out, s + SHAKE_S, amp(db + SHAKE_DB) * burst(BRUSHES, t60=.12, tail_db=-3, tail_t60=.2))
    for s, db, hz, treble_db, thud_db in KNOCKS:
        soft_start = burst(CLACK, t60=.05, tail_db=-10, tail_t60=.06)
        add(out, s - KNOCK_START_S, amp(db + KNOCK_START_DB) * soft_start)
        body = .76 * clack(hz, focus_db=12) + .22 * burst(CLACK, t60=.04, tail_db=-10, tail_t60=.15)
        treble = amp(treble_db + 6) * burst(SNAP, t60=0.011, tail_db=-14, tail_t60=0.08)
        add(out, s, amp(db) * (body + treble))
        add(out, s, amp(thud_db) * burst(THUD, t60=.12, tail_db=-2, tail_t60=.25))
    return pan(out, left_db=1)


def button():
    """A dry click of the ringing plastic shell, just before the winch answers."""
    out = np.zeros((2, N))
    for s, db in BUTTON:
        snap = burst(SNAP, t60=.014, tail_db=-16, tail_t60=.08)
        add(out, s, amp(db) * (.65 * struck(SHELL) + .5 * snap))
    return out


def judder():
    """The loaded rope sticks and slips in uneven jerks that crunch through the deck plate."""
    out = np.zeros((2, N))
    t = np.arange(SR // 2) / SR
    crunch = unit(colour(rattle(JUDDER_SLIPS_PER_S, size_db=2, smooth=.45), CRUNCH, PLATE))
    for s, length, db, release in JUDDER:
        level = amp(db - release * np.maximum(t - length, 0)) * (1 - np.exp(-t / JUDDER_ATTACK_S))
        add(out, s, level * crunch[:, round(s * SR):][:, :len(t)])
    return out


def brake():
    """The shoes chatter over a gritty slide and ring the drum; each drag has its own slip rate and colour."""
    out = np.zeros((2, N))
    t = np.arange(SR * 3 // 4) / SR
    grit = flare(rattle(1500, size_db=2.5, smooth=.6), patchy_db=1.8)
    wander = wobble(200) + wobble(20)
    grab = amp(1.3 * wobble(70))
    for s, length, db, release, chatter_hz, chatter_db, treble_db, ratio in BRAKE:
        now = np.arange(len(t)) + round(s * SR)
        cycles = np.cumsum(chatter_hz * (1 + CHATTER_JITTER * wander[now])) / SR
        # one slip at each completed cycle, of scattered size
        slips = unit(np.diff(np.floor(cycles), prepend=0) * amp(2 * rng.standard_normal(len(t))))
        spectrum = [(hz, level + treble_db * np.clip(np.log2(hz / 3000), 0, 1)) for hz, level in RASP]
        modes = [(hz * ratio, width, lift) for hz, width, lift in DRUM]
        rasp = colour(unit(grit[:, now]) + amp(chatter_db) * slips, spectrum, modes)
        # even out the strength from moment to moment
        rasp /= np.sqrt(np.abs(uniform_filter1d(np.mean(rasp ** 2, axis=0), size=1500)))
        level = amp(db - release * np.maximum(t - length, 0)) * (1 - np.exp(-t / BRAKE_ATTACK_S))
        add(out, s, level * grab[now] * rasp)
    return pan(out, left_db=2.5)


def squeak():
    """Steel slides on steel: one thin tone that sags as it fades."""
    hz, db = curves(SQUEAK)
    phase = 2 * np.pi * np.cumsum(hz * (1 + .003 * wobble(280))) / SR
    return pan(amp(db) * (np.sin(phase) + amp(-40.5) * np.sin(2 * phase)), left_db=8.5)


def arrival(x):
    """Sound takes slightly longer to the left: delays that channel by a fraction of a sample."""
    size = next_fast_len(N + 512, True)
    delay = np.exp(-2j * np.pi * np.fft.rfftfreq(size, 1 / SR) * LEFT_LAG_S)
    return np.array([irfft(rfft(x[0], size) * delay, size)[:N], x[1]])


def scene():
    """The winch close by, the outdoors behind it."""
    blows = whine() + rope() + contactor()
    winch = gear_train() + singing() + button() + judder() + brake() + squeak() + blows
    return outdoors() + arrival(winch) + amp(-11.5) * yard(blows)


def record(dry):
    """Sets the stereo width over time, rounds off the tallest peaks and cuts everything above the top limit."""
    mid = (dry[0] + dry[1]) / 2
    side = (dry[0] - dry[1]) / 2 * amp(curves(WIDTH)[0])
    x = np.array([mid + side, mid - side])
    x = x / (1 + (x / .6) ** 8) ** (1 / 8)
    size = next_fast_len(N + SR // 2)
    return irfft(rfft(x, size) * (np.fft.rfftfreq(size, 1 / SR) < TOP_HZ), size)[:, :N]


dry = scene()
out = record(dry)
generate_wav(out)
```